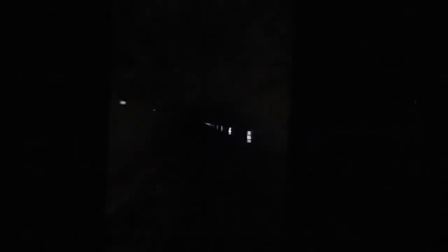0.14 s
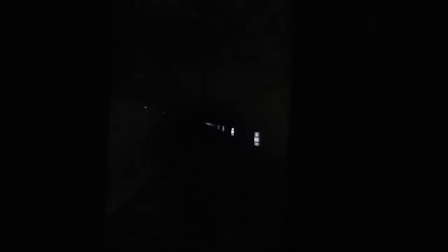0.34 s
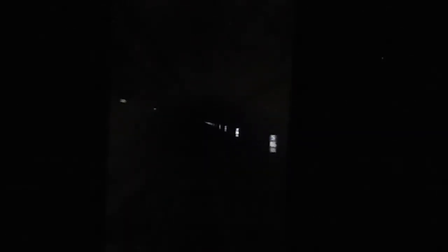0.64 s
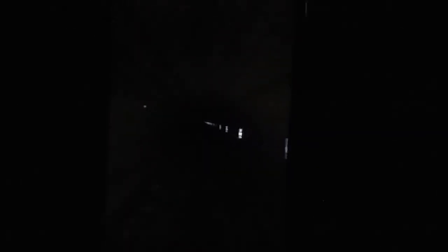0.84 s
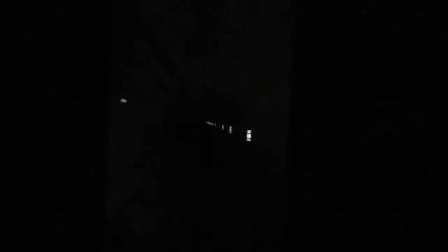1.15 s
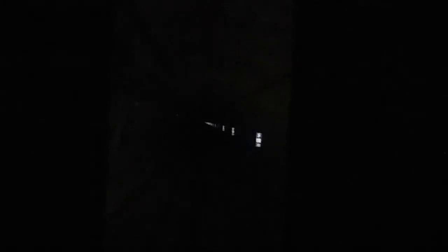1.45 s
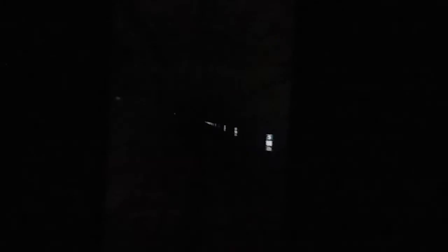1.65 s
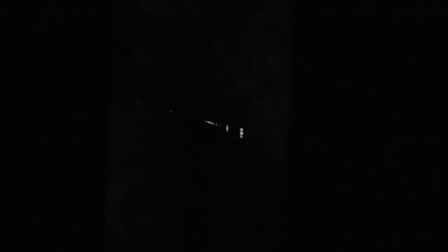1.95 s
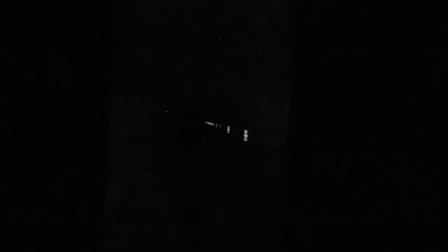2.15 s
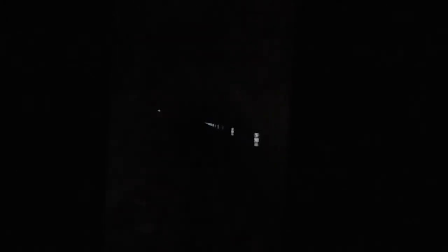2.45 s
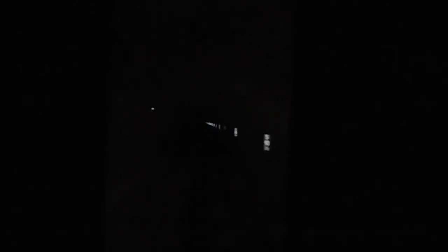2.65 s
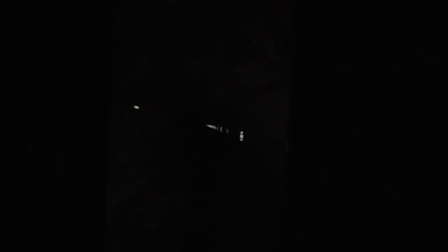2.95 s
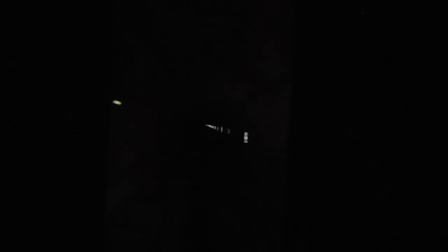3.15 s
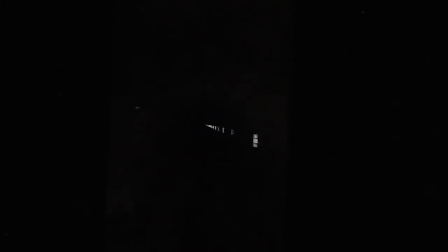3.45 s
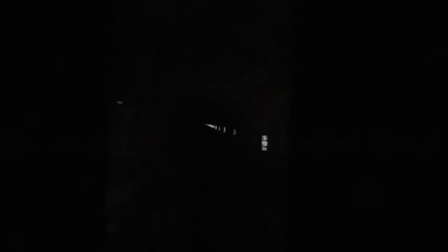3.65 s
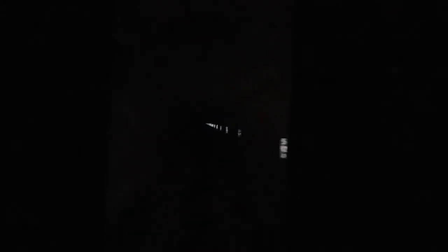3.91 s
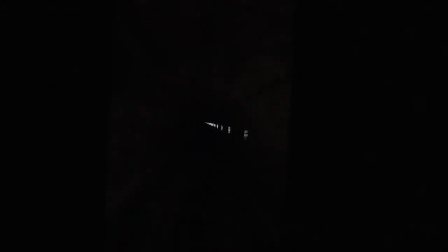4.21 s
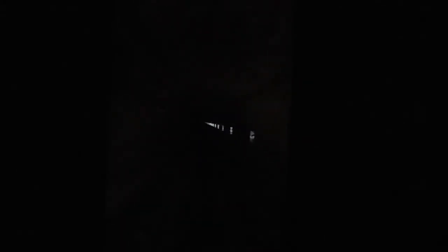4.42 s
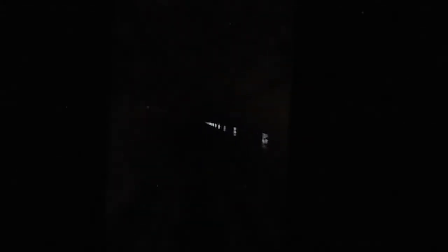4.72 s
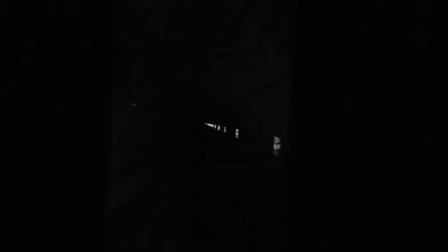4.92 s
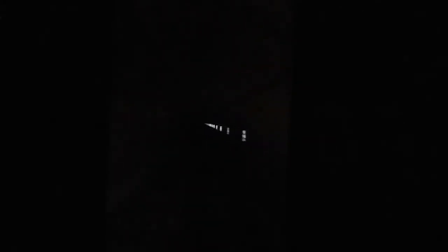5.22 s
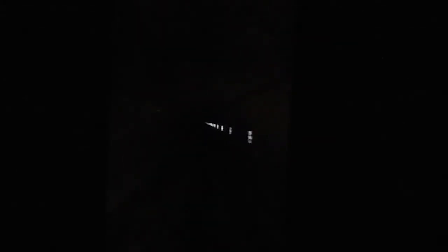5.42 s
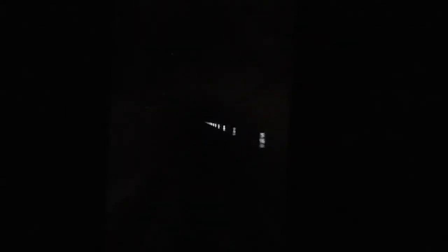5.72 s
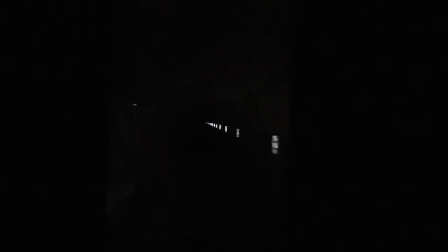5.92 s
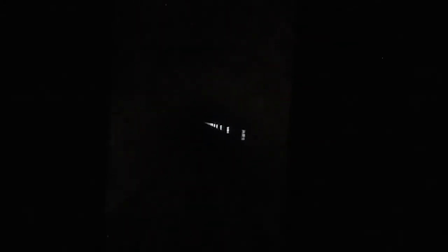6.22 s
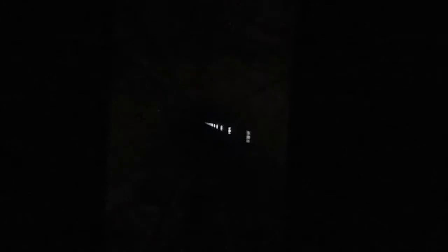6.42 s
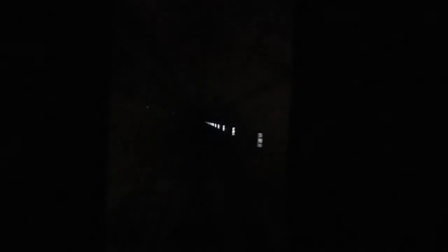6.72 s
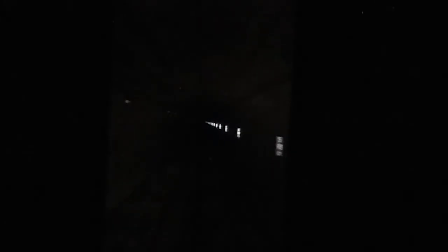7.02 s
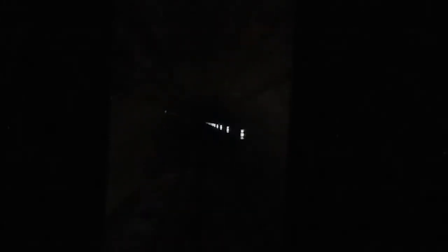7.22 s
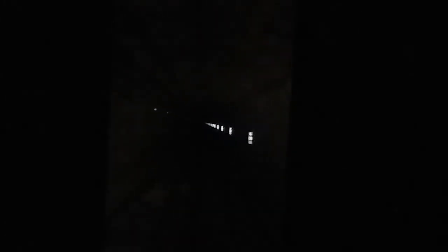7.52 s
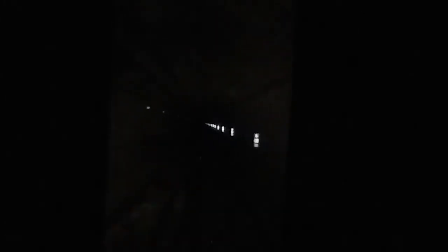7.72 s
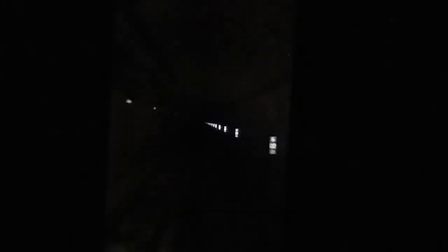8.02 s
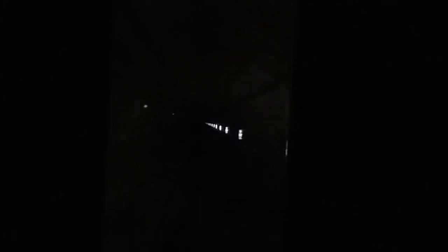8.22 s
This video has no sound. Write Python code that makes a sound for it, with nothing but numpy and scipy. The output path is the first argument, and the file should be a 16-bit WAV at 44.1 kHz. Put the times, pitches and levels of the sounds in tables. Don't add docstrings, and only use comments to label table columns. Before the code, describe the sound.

Heavy wheel-and-rail roar fills a moving train cab in a tunnel, a constant mid-high whine above it, loose trim clicking throughout.

```python
import sys
import numpy as np
from scipy import signal
from scipy.fft import rfft, irfft
from scipy.io import wavfile
from scipy.ndimage import uniform_filter1d, minimum_filter1d

SR = 44100
rng = np.random.default_rng(int(sys.argv[2]) if len(sys.argv) > 2 else 0)


def to_wav(sig):
    pcm = np.clip(np.atleast_2d(sig), -1, 1) * 32767
    pcm = np.round(pcm).astype(np.int16)
    wavfile.write(sys.argv[1], SR, pcm.T)


def voltage_ratio(level):
    return 10 ** (np.asarray(level, float) / 20)


N = 368676
T = np.arange(N) / SR
HZ = np.maximum(np.arange(N // 2 + 1) * SR / N, 1.)

# (time [s], depth [dB])
RAIL_WAVES = [(0, -3), (.6, -2.5), (1, .5), (1.55, -1.5), (1.85, -2), (2.15, 7), (2.55, 1.5), (2.75, 6.5),
              (3.1, 6), (3.4, 4.5), (3.7, 4.5), (4.1, 1), (4.6, 2.5), (5.25, -1), (5.55, 3), (6.4, -1.5),
              (7.6, -3), (8.36, 2)]
# (time [s], level [dB])
RAIL_GRAIN = [
    (0, -1.5),
    (1, 2),
    (2, -0.5),
    (2.9, 2.5),
    (3.5, 2),
    (4.1, 0),
    (5.6, 0.5),
    (7.3, -2),
    (8.36, -3.5),
]
# (frequency [Hz], density [dB per Hz])
FLOOR_COLOUR = [(11, -46.5), (18, -17), (75, -0.5), (102, 0.5), (173, -0.5), (213, -4.5), (253, -4),
                (324, -9.5), (345, -11.5), (450, -49), (760, -120)]
# (frequency [Hz], density [dB per Hz])
TRACK_COLOUR = [(300, -18), (350, -11.5), (500, 1), (800, -6), (1000, -11.5), (1300, -15), (1750, -21.5),
                (2100, -27.5), (2600, -39)]
# (frequency [Hz], width [Hz], level [dB])
LOW_MODES = [(398.5, 50, 3.5), (439, 65, 1.5)]
# (frequency [Hz], width [Hz], level [dB])
HIGH_MODES = [(583, 86, 2.5), (649.6, 108, 5.5), (685, 130, -4)]
# (frequency [Hz], width [Hz], level [dB])
WHINE_MODES = [(1546.5, 24, -1), (1538, 182, -8), (1608, 190, -9.5), (1740, 370, -15)]
# (frequency before [Hz], frequency after [Hz], time of change [s], level on plain rail [dB],
# rise with rail waves [dB per squared dB], rise with grain [dB per dB])
SINGING_MODES = [(436.5, 425, 3.95, -27.5, .3, .1), (612.5, 605.5, 2.55, -29.5, .3, 1.6)]
# (frequency [Hz], level [dB])
GEAR_TONES = [(1975, -56), (3220, -65.5)]
# (time [s], peak level [dB], left minus right [dB])
PANEL_TICKS = [(.6856, -40, 6), (.8798, -36.5, 9), (1.1797, -43.5, 1), (1.44, -42.5, -3), (1.925, -39.5, 4),
               (2.0808, -39, 1.5), (2.6218, -39, 3), (2.7155, -36, -6), (3.1142, -37.5, 3),
               (3.1784, -30, 1), (3.644, -33.5, 6.5), (3.817, -39.5, 8), (3.867, -41.5, 6),
               (4.096, -41.5, -1), (4.2566, -35.5, -2), (4.9102, -43, 1.5), (5.008, -33, 1.5),
               (5.5123, -39, 10), (5.6968, -36.5, 8), (6.078, -41, 5.5), (6.2387, -35, -2.5),
               (6.4082, -35.5, 0.5), (6.5498, -31.5, -1), (6.6502, -39.5, -6), (6.7145, -39.5, 4),
               (6.7919, -41, 1.5), (6.9372, -32, 5), (7.1456, -32, -6), (7.7691, -33.5, 6.5),
               (7.9898, -35, 8)]
FAINT_TICKS = [.946, 1.309, 1.603, 1.692, 2.246, 2.340, 2.506, 2.592, 3.490, 3.707, 3.755, 4.147, 4.210,
               4.519, 5.816, 5.873, 6.290, 7.274, 7.479, 7.693]
# (frequency [Hz], width [Hz], level [dB])
PANEL_MODES = [(2720, 1100, 5), (4160, 1500, 0), (5920, 1500, -2), (7780, 1200, -4.5), (9200, 700, -13),
               (10800, 2000, -21)]
# (time [s], peak level [dB])
LATCH_RATTLES = [(0.9633, -40), (1.3074, -38), (1.4412, -36.5), (1.617, -30), (2.5872, -35), (3.219, -40),
                 (3.9427, -35.5), (4.4503, -35.5), (4.9094, -41), (5.0577, -33), (5.1677, -36.5),
                 (5.6217, -36), (6.537, -40), (6.615, -45), (6.7461, -39)]
# (frequency [Hz], width [Hz], level [dB])
LATCH_MODES = [(4040, 820, 3.5), (6100, 900, -11.0)]
# (time [s], hold [s], level [dB], bright share [dB])
SLEEVE_SLIPS = [
    (.33, .032, -47, -3),
    (.379, .025, -38.5, -20),
    (.408, .025, -42, -4.5),
    (.435, .04, -49, 1),
    (.48, .03, -55, 0),
    (.52, .06, -63, -1),
]
# (frequency [Hz], width [Hz], level [dB])
DULL_CLOTH = [(3800, 3900, 0.0), (6060, 2200, 2.5), (8000, 1500, -8.5)]
BRIGHT_CLOTH = [(8200, 1500, 2.5), (10800, 2200, -1), (13100, 2200, 3.0), (14900, 2500, -3)]
# (time [s], length [s], frequency [Hz], level [dB])
SEAL_SQUEAKS = [
    (1.845, .065, 11400, -77),
    (1.955, 0.099, 12560, -64),
    (2.062, .025, 12570, -68),
    (2.09, .04, 11900, -76),
]
# (frequency [Hz], density [dB per Hz])
AIR_COLOUR = [(1900, -8), (2400, 2), (3000, 0), (3700, -3.5), (4250, -2), (4900, -12.5), (5400, -13.5),
              (6300, -13), (7200, -20.5), (8000, -20), (9000, -34), (11000, -40), (12800, -31),
              (15900, -39)]
# (frequency [Hz], likeness [0-1], left minus right [dB])
MIC_PORTS = [(100, 1, 0.54), (300, 0.98, 0.24), (700, .94, 1), (870, 0.7, 1.5), (1080, 1, 3),
             (1340, 0.16, 6), (1550, 1, 10.5), (2000, 0.7, 3), (2500, .72, -3), (3200, .56, -0.5),
             (4200, .64, 2), (5200, .65, -2), (7000, .55, 2), (13450, 0.7, -0.5)]

FLOOR_DB, TRACK_DB, LOW_MODES_DB, HIGH_MODES_DB = -17.5, -19, -21.5, -19
LOW_PER_WAVE, HIGH_PER_WAVE, TRACK_PER_GRAIN = 0.89, 0.21, 0.21
WHINE_DB, WHINE_DIP_DB, WHINE_DIP_S, WHINE_DIP_WIDTH_S = -22, -3, 4.9, 2.46
PITCH_SHIFT_S = 0.056
TICK_TOP_DB, TOP_PER_DB, HARD_TICK_DB = -14.5, .7, -32
FAINT_DB, FAINT_SPREAD_DB, FAINT_PAN_DB = -45, 1, 4.5
SNAP = 6
DRAG_DB, DRAG_SWELL_S, DRAG_STOPS_S, DRAG_BRIGHT_DB = -48.5, .32, .364, -4.5
SLIP_ATTACK_S, SLIP_FADE_DB_S, SETTLE_FADE_DB_S = .006, 380, 55
ARCH_HZ_PER_S, SQUEAK_EDGE_S = 2000, .012
SEAL_HAZE_DB, AIR_DB = -71.5, -45


def curves(rows):
    s, *columns = np.transpose(rows)
    return [np.interp(T, s, c) for c in columns]


def over_hz(rows):
    f, *columns = np.transpose(rows)
    return [np.interp(np.log(HZ), np.log(f), c) for c in columns]


def unit(x):
    return x / np.sqrt(np.mean(x ** 2))


def walk(rate):
    k = int(SR / rate)
    steps = np.repeat(rng.standard_normal(N // k + 1), k)
    return 1.292 * uniform_filter1d(uniform_filter1d(steps, k), k)[:N]


def resonances(modes, order, hz_axis=HZ):
    power = 0
    for hz, width, db in modes:
        detuning = (hz_axis ** 2 - hz ** 2) / (hz_axis * width)
        power = power + voltage_ratio(2 * db) / (1 + detuning ** 2) ** order
    return np.sqrt(power)


def rough(response):
    return unit(irfft(rfft(rng.standard_normal((2, N))) * response, N))


def bands(points, swell_db, flicker_db, flicker_rate):
    inside = (HZ > points[0][0]) & (HZ < points[-1][0])
    spectrum = rfft(rng.standard_normal((2, N))) * voltage_ratio(over_hz(points)[0]) * inside
    out, swell = 0, swell_db * walk(3)
    step = 2 * np.log2(HZ)
    for centre in np.arange(np.floor(step[inside][0]), step[inside][-1] + 1):
        share = np.cos(np.pi / 2 * np.clip(step - centre, -1, 1)) ** 2
        flicker = flicker_db * walk(flicker_rate)
        out = out + voltage_ratio(swell + flicker) * irfft(spectrum * share, N)
    return unit(out)


def tone(hz, db, wander_hz, flutter_db, rate):
    wander = wander_hz * np.array([walk(rate), walk(rate)])
    phase = 2 * np.pi * np.cumsum(hz + wander, axis=1) / SR
    return np.sqrt(2) * voltage_ratio(db + flutter_db * walk(rate)) * np.sin(phase)


def rolling():
    (wave_db,), (grain_db,) = curves(RAIL_WAVES), curves(RAIL_GRAIN)
    floor = voltage_ratio(FLOOR_DB) * bands(FLOOR_COLOUR, .3, 0.5, 6)
    track = voltage_ratio(TRACK_DB + TRACK_PER_GRAIN * grain_db) * bands(TRACK_COLOUR, 0.97, 0.77, 8)
    low_db = LOW_MODES_DB + LOW_PER_WAVE * wave_db + 1.2 * walk(9)
    low = voltage_ratio(low_db) * rough(resonances(LOW_MODES, order=2))
    high_db = HIGH_MODES_DB + grain_db + HIGH_PER_WAVE * wave_db + 0.73 * walk(10)
    high = voltage_ratio(high_db) * rough(resonances(HIGH_MODES, order=2))
    whine_db = WHINE_DB + WHINE_DIP_DB * np.exp(-((T - WHINE_DIP_S) / WHINE_DIP_WIDTH_S) ** 2)
    whine = voltage_ratio(whine_db + 0.31 * walk(14)) * rough(resonances(WHINE_MODES, order=2))
    return floor + track + low + high + whine


def singing():
    (wave_db,), (grain_db,) = curves(RAIL_WAVES), curves(RAIL_GRAIN)
    out = sum(tone(hz, db, 1.0, 2.0, 6.2) for hz, db in GEAR_TONES)
    for before_hz, after_hz, s, db, per_wave, per_grain in SINGING_MODES:
        hz = np.interp(T, [s - PITCH_SHIFT_S, s + PITCH_SHIFT_S], [before_hz, after_hz])
        mode_db = db + per_wave * wave_db * np.abs(wave_db) + per_grain * grain_db
        out = out + tone(hz, mode_db, 2.2, 2.5, 22)
    return out


def add_hit(out, s, db, pan_db, modes, shape, low_hz, snap):
    f = np.maximum(np.arange(2049) * SR / 4096, 1.)
    push = rng.standard_normal((2, 4096)) * shape
    push[0, np.argmax(shape)] = snap
    ring = rfft(push) * resonances(modes, order=2, hz_axis=f)
    energy = np.sum(np.abs(ring[0, f > low_hz]) ** 2)
    common, differing = irfft(ring, 4096) * 256 / np.sqrt(energy)
    hit = np.array([common, .7 * differing + .05 * pan_db * common])
    start = int(s * SR) - 64
    out[:, start:start + 4096] += voltage_ratio(db) * hit


def panel():
    out, t = np.zeros((2, N + 4096)), (np.arange(4096) - 128) / SR
    crack = (t >= 0) * np.exp(-np.abs(t) / .0011)
    bounce = 0.18 * np.exp(-((t - .004) / 0.00076) ** 2)
    tail = .26 * (t >= 0) * np.exp(-t / 0.012)
    rattle = (t >= 0) * np.exp(-t / 0.014)
    size, place = rng.standard_normal((len(FAINT_TICKS), 2)).T
    faint = np.transpose([FAINT_TICKS, FAINT_DB + FAINT_SPREAD_DB * size, FAINT_PAN_DB * place])
    for s, db, pan_db in [*PANEL_TICKS, *faint]:
        top_db = TICK_TOP_DB + TOP_PER_DB * max(db - HARD_TICK_DB, -9)
        modes = [*PANEL_MODES, (13000, 2200, top_db)]
        add_hit(out, s, db - 1.0, pan_db, modes, crack + bounce + tail, 5000, SNAP)
    for s, db in LATCH_RATTLES:
        add_hit(out, s, db + 1.5, 0, LATCH_MODES, rattle, 3000, 0)
    return out[:, :N]


def cloth():
    creep_db = DRAG_DB - SLIP_FADE_DB_S * np.clip(T - DRAG_STOPS_S, 0, 1)
    creep = np.tanh(.3 + T / DRAG_SWELL_S) * voltage_ratio(creep_db)
    dull_power, bright_power = creep ** 2, (creep * voltage_ratio(DRAG_BRIGHT_DB)) ** 2
    for i, (s, hold, db, bright_db) in enumerate(SLEEVE_SLIPS):
        last = i == len(SLEEVE_SLIPS) - 1
        fade_db_s = SETTLE_FADE_DB_S if last else SLIP_FADE_DB_S
        slip_db = db - fade_db_s * np.clip(T - s - hold, 0, 1)
        slip = np.clip((T - s) / SLIP_ATTACK_S, 0, 1) * voltage_ratio(slip_db)
        dull_power = dull_power + slip ** 2
        bright_power = bright_power + (slip * voltage_ratio(bright_db)) ** 2
    dull = rough(resonances(DULL_CLOTH, order=2))
    bright = rough(resonances(BRIGHT_CLOTH, order=2))
    touching = T < SLEEVE_SLIPS[-1][0] + 1
    ragged = touching * voltage_ratio(1.2 * np.array([walk(49), walk(49)]))
    return ragged[0] * np.sqrt(dull_power) * dull + ragged[1] * np.sqrt(bright_power) * bright


def seal():
    out, haze = 0, rough(resonances([(12600, 2600, 0)], order=2))
    for s, length, hz, db in SEAL_SQUEAKS:
        arch = np.sin(np.pi * np.clip((T - s) / length, 0, 1))
        gate = np.clip(np.minimum(T - s, s + length - T) / SQUEAK_EDGE_S, 0, 1)
        out = out + gate * tone(hz + ARCH_HZ_PER_S * length * arch, db, 70., 3.5, 90)
    return out + voltage_ratio(SEAL_HAZE_DB) * np.exp(-((T - 2.0) / .15) ** 2) * haze


def air():
    grit = voltage_ratio(2.2 * rng.exponential(size=N // 64 + 1)).repeat(64)[:N]
    rush = bands(AIR_COLOUR, .4, 1, 16)
    return voltage_ratio(AIR_DB) * rush * unit(1 + .5 * uniform_filter1d(grit, size=128))


def scene():
    common, differing = rfft(rolling() + singing() + panel() + cloth() + seal() + air())
    likeness, pan_db = over_hz(MIC_PORTS)
    likeness = np.clip(likeness, 0, 1)
    side = np.sqrt((1 - likeness) / (1 + likeness)) * differing
    left_gain, right_gain = voltage_ratio(pan_db / 2), voltage_ratio(-pan_db / 2)
    ports = np.array([(common + side) * left_gain, (common - side) * right_gain])
    return irfft(ports * 2 / (left_gain + right_gain), N)


def roll_off(x):
    return signal.sosfilt(signal.butter(12, 15830, fs=SR, output="sos"), x)


def record(dry):
    peak = np.abs(dry).max(axis=0) + 1e-9
    squeeze = voltage_ratio(0.45) * np.minimum(1, (0.59 / peak) ** 0.39)
    need = np.minimum(squeeze, .97 / peak)
    hold = minimum_filter1d(need, size=441)
    gain = uniform_filter1d(uniform_filter1d(hold, size=220), size=220)
    return roll_off(dry * gain)


dry = scene()
out = record(dry)
to_wav(out)
```